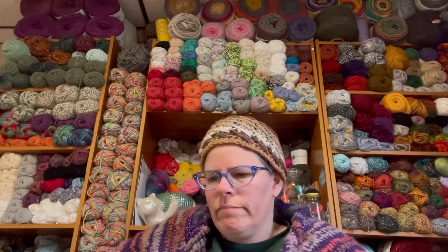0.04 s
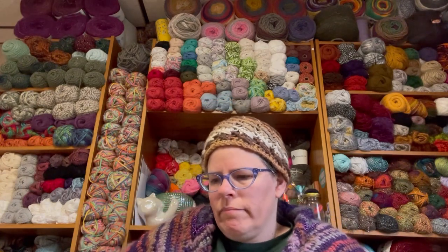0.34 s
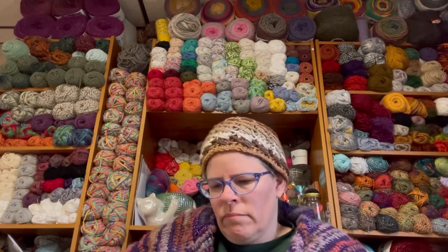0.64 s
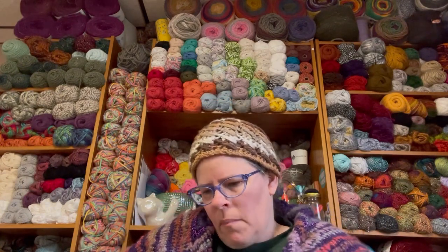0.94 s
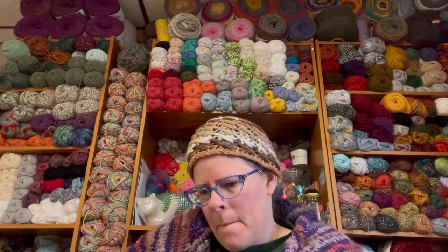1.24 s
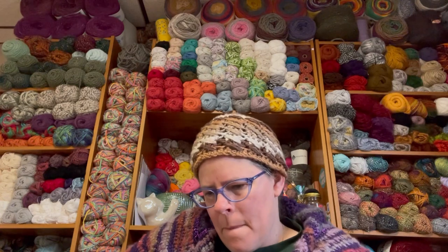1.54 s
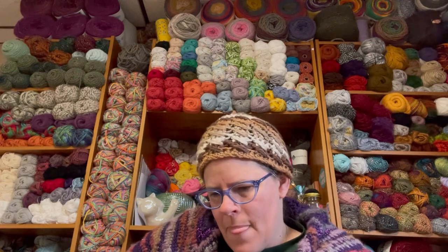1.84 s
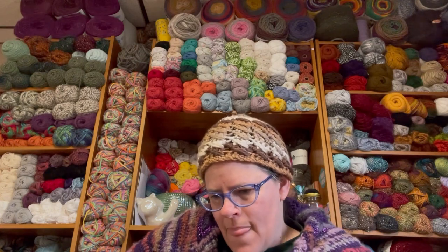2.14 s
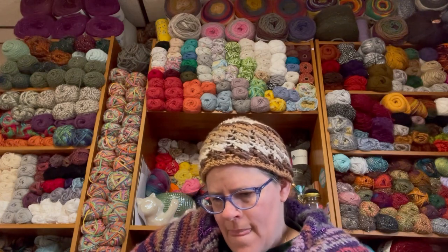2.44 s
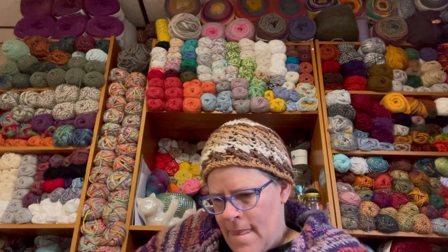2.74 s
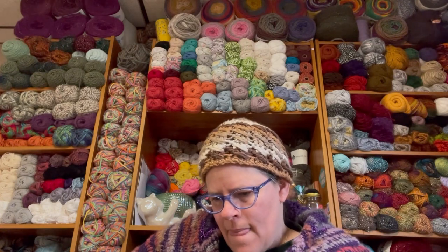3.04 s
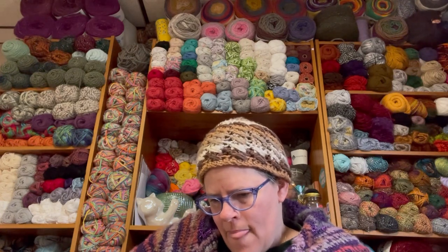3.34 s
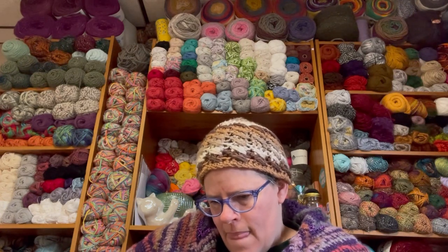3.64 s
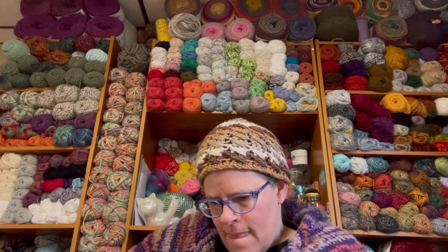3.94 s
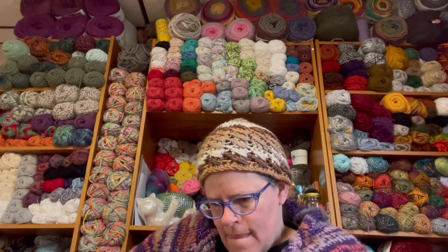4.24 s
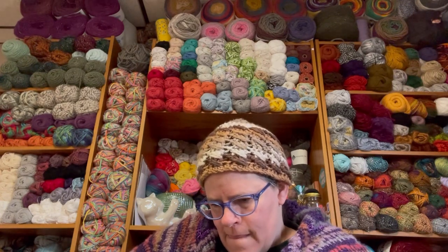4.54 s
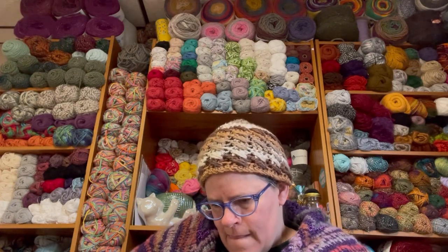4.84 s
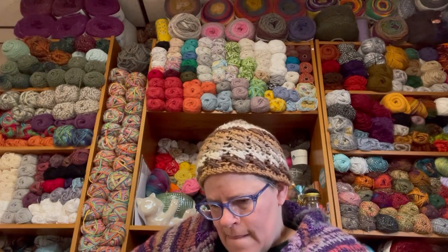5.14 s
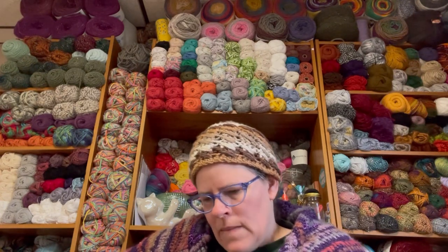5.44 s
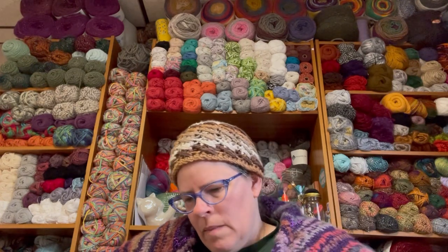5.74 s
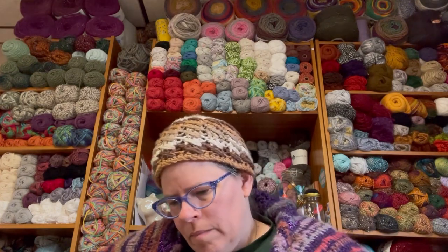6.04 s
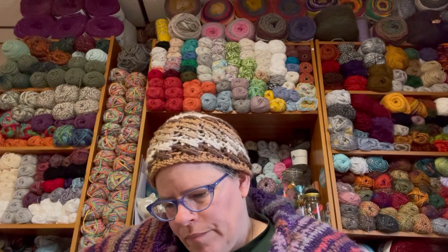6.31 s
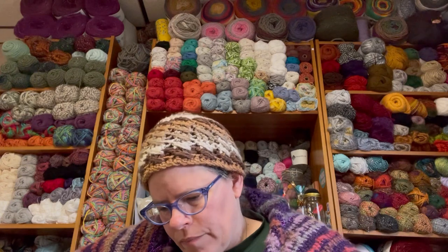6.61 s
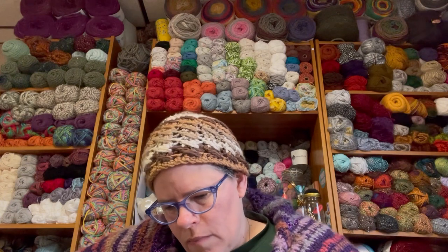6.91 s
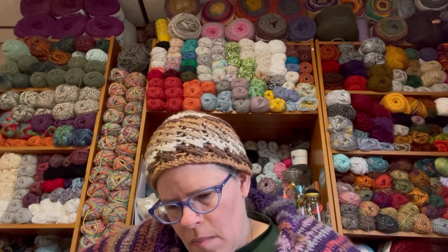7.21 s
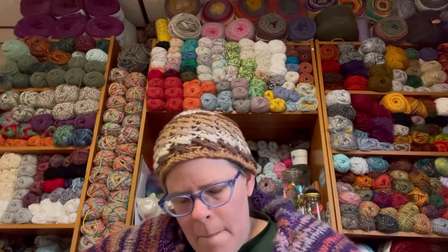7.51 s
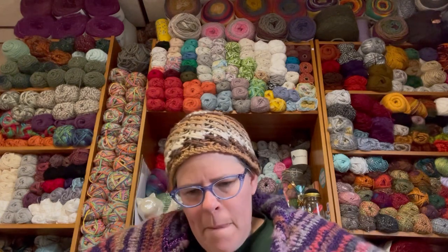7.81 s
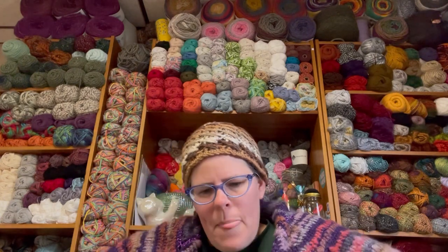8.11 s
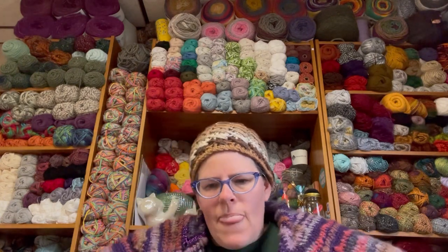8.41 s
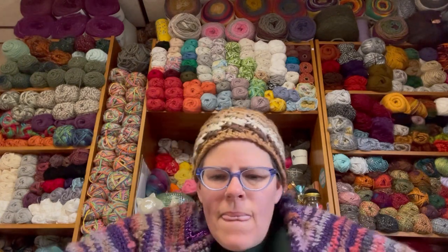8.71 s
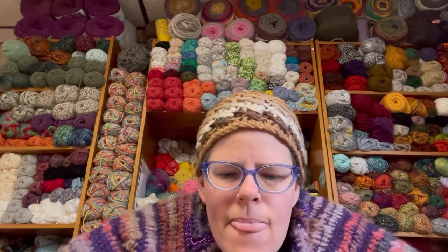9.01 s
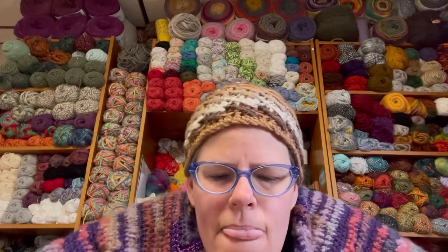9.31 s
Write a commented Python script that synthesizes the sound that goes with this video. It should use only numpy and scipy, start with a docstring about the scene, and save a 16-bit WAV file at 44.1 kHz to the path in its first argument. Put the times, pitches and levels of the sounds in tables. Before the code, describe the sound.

Fingers pick at packing tape on a cardboard box, starting with a tiny squeak and a few ticks. The tape comes away in short crackling jerks that drum on the cardboard. Hands brush the box, flaps knock and there is a sharp snap. Cardboard then slides with a hiss, a brief whistle and a judder, ending in a heavy knock. It is heard up close on a phone in a small, damped room with a low rumble.

```python
"""Over a low rumble, in a small room damped by shelves of yarn, fingers pick at packing tape on a box.
From 1.5 to 5 s the tape comes off in short jerks: its glue lets go in tiny slips that crackle in the
film and drum on the cardboard. Hands brush the box, flaps knock, and a sharp snap lands at 6.1 s.
From 7.2 s cardboard slides, an edge whistles and a flap judders; the heaviest knock comes at 8.8 s.
It is all heard up close, through a phone's stereo microphones."""
import sys
import numpy as np
from scipy import signal
from scipy.fft import rfft, irfft, next_fast_len
from scipy.io import wavfile
from scipy.ndimage import uniform_filter1d, map_coordinates

SR = 44100
rng = np.random.default_rng(int(sys.argv[2]) if len(sys.argv) > 2 else 0)


def persist_wave(psi):
    """Save psi, clipped to +-1, as 16-bit WAV."""
    counts = np.round(np.clip(psi, -1, 1) * 32767).astype(np.int16)
    wavfile.write(sys.argv[1], SR, np.atleast_2d(counts).T)


N = 412776

# Levels in the tables are relative; each layer sets its own trim.
# room tone, the low rumble and the faint hiss: freq_hz, level_db
RUMBLE_EQ = [(12, -41.5), (20, -16), (31, -6.5), (59, 2.5), (92, -12.5), (124, -2.5), (147, -19),
             (228, -15.5), (332, -20), (474, -30), (527, -34), (947, -42), (1120, -46.5), (1440, -67.5),
             (3000, -46.5), (3900, -84.5), (6600, -120)]
AIR_EQ = [(1000, 11), (2500, -0.5), (4500, -2), (7500, -2.5), (10000, 0), (14000, -7), (16000, -19.5)]
# early reflections off the shelves: freq_hz, level_db
SHELF_EQ = [(100, -8), (500, -9), (1200, -7), (2500, -1.5), (5000, -2.5), (9000, -12.5)]
# decay of the room's tail: freq_hz, t60_s
ROOM_DECAY = [(100, 0.47), (500, 0.14), (2000, 0.31), (8000, 0.36), (15000, 0.078)]
# modes of the panels, of the whole box with its air, and of a flap: freq_hz, level_db, t60_s
PANEL_MODES = [(220, -2.5, 0.035), (263.6, -0.5, 0.051), (311.7, -10.5, 0.087), (391, -2.5, 0.048),
               (477, -6.5, 0.058), (534.5, -2, 0.049), (645, -0.5, 0.039), (745, -2, 0.016),
               (884, -0.5, 0.03), (997, -0.5, 0.017), (1250, -12, 0.022), (1435, -13.5, 0.01),
               (1732, -7, 0.023), (1900, -11.5, 0.023), (2463, -9, 0.01), (4150, -14, 0.015)]
BOX_MODES = [(65.6, -13, 0.098), (90.5, 5.5, 0.039), (130, -6, 0.045), (167.6, -1, 0.051)]
FLAP_MODES = [(291, -9, 0.045), (484, -8.5, 0.019), (720, -2, 0.032), (900, -0.5, 0.02), (1060, -0.5, .016),
              (1219, -0.5, 0.01), (1964, -5.5, 0.014), (2520, -7.5, 0.012)]
# colours of a rubbing fingertip, scraping board and hissing paper fibres: freq_hz, level_db
FINGERTIP_EQ = [(700, 1), (1600, -13), (2150, 4), (2800, -13), (4500, -19), (5500, -7), (6800, -28),
                (12000, -35)]
SCRAPE_EQ = [(60, -28.5), (150, 5), (330, 0), (750, 2), (1200, -5), (1600, -10.5), (2200, -9),
             (3200, -18.5), (6000, -40), (15000, -49.5)]
FIBRE_EQ = [(800, -5.5), (2900, -7.5), (4000, -4), (5200, -5), (7000, -1.5), (9000, 0), (11000, -2),
            (13000, -3.5), (15000, -14.5), (16500, -23)]
# colours of ticking film, a knock's crack and the peel's crackle: freq_hz, level_db
FILM_EQ = [(500, -3.5), (1300, 0), (2200, -2), (4000, -4), (7000, -3), (11000, 5), (15500, -5.5)]
CRACK_EQ = [(200, -21.5), (900, 4), (2000, 6), (3000, -5), (5000, -3), (7000, 2.5), (10000, 4.5),
            (15000, -0.5)]
CRACKLE_EQ = [(300, -69.5), (1000, 11), (2400, 3.5), (3400, -2), (5000, -2.5), (7500, 0.5), (10000, 2),
              (15000, -10.5)]
# a fingertip rubs the tape: start_s, hold_s, level_db
FINGER_RUBS = [(.61, 0.022, -72), (.72, 0.073, -81), (2.797, 0.017, -77), (2.883, .15, -82),
               (3.126, .1, -77), (3.25, .1, -77)]
# a tiny opening squeak, and an edge whistling in the long slide: time_s, pitch_hz, level_db
SQUEAK_CURVE = [(.065, 2900, -82), (.073, 2840, -68), (.079, 2400, -84), (.083, 2170, -57),
                (.089, 2325, -80), (0.096, 2210, -58), (0.109, 1650, -84), (.122, 1610, -64),
                (.15, 1660, -87)]
WHISTLE_CURVE = [(7.7, 2495, -74), (7.8, 3090, -51), (7.88, 3810, -74)]
# a flap's edge drags over the box: time_s, level_db
DRAG_CURVE = [(8.062, -63), (8.069, -43.5), (8.082, -38), (8.093, -38.5), (8.105, -37), (8.128, -36.5),
              (8.165, -42.5), (8.23, -54)]
# short strokes of hands and cardboard: start_s, hold_s, scrape_db, hiss_db
SHORT_STROKES = [(1.173, 0.045, -52.5, -60.5), (1.255, 0.035, -60, -65.5), (1.673, 0.12, -69, -70),
                 (1.845, 0.19, -64.5, -67), (2.125, 0.023, -66, -66), (2.287, 0.042, -67.5, -70),
                 (2.598, 0.058, -62, -70.5), (3.475, 0.026, -64.5, -67), (5.229, 0.045, -45, -53.5),
                 (5.304, 0.096, -55.5, -64), (5.422, 0.067, -52.5, -52), (5.49, 0.093, -57.5, -56.5),
                 (5.613, 0.33, -63, -68), (5.813, 0.027, -50, -44), (5.874, 0.043, -61, -66),
                 (5.96, 0.16, -62, -58.5), (6.13, 0.024, -51.5, -75), (6.266, 0.15, -59, -54.5),
                 (6.468, 0.042, -47, -46), (6.557, 0.043, -48.5, -48), (6.636, 0.081, -54, -66.5),
                 (7.094, 0.0056, -61.5, -99.5), (8.804, 0.1, -56.5, -61.5), (8.939, 0.062, -52, -58),
                 (9.172, 0.16, -72, -73.5)]
# one long slide across the box: time_s, scrape_db, hiss_db
SLIDE_CURVE = [(7.24, -61.5, -64), (7.438, -49, -55), (7.628, -49.5, -56), (7.696, -54.5, -43),
               (7.836, -60, -42), (7.904, -53, -55), (7.988, -51.5, -47.5), (8.052, -49, -59.5),
               (8.094, -47, -45), (8.242, -49, -53.5), (8.322, -48, -48.5), (8.378, -50.5, -59),
               (8.534, -50, -48.5), (8.552, -48, -56.5), (8.576, -54.5, -50), (8.76, -78.5, -71)]
# ticks of film and fingernails: peak_s, level_db, centre_hz, t60_s, narrowness
FILM_TICKS = [(0.1028, -35.5, 9000, 0.072, 0.3), (1.1486, -42.5, 2780, 0.031, 0.5),
              (1.1915, -31, 8260, 0.016, 0.63), (1.9438, -27, 7360, 0.0077, 0.34),
              (2.2787, -38, 8950, 0.011, 0.63), (2.4358, -36, 4200, .01, 0.72),
              (2.4888, -35, 2230, .01, .5), (2.5126, -32, 4000, .01, 0.39), (2.5518, -40, 1900, .008, 0.67),
              (2.5638, -27.5, 1400, 0.0033, 0.46), (3.204, -59, 3220, 0.041, 1.1),
              (3.242, -50, 1800, 0.033, 0.42), (3.705, -31, 2480, 0.0057, .5),
              (4.0797, -46, 7950, .012, 0.57), (4.153, -36, 9170, 0.011, 0.45),
              (4.2495, -30, 4000, 0.0068, 0.39), (4.9421, -29, 8370, 0.0088, 0.61),
              (5.2748, -14.5, 1392, 0.014, 0.49), (5.6096, -35.5, 4200, 0.0094, 0.6),
              (5.7, -32.5, 4400, 0.019, 0.71), (6.098, -8, 10500, 0.021, 0.32),
              (6.1101, -6, 8000, 0.0085, .6), (6.718, -44, 3500, 0.012, .4),
              (7.225, -41.5, 2680, 0.059, 0.38), (8.768, -37.5, 8700, 0.011, 0.45),
              (9.25, -38, 3840, 0.015, 0.29)]
# blows on the box: start_s, thump_db, panel_db, crack_db, centre_hz, narrowness
BOX_KNOCKS = [(1.1975, -55, -33.5, -61, 860, 2.6), (1.1988, -51, -26.5, -78, 432, 1.8),
              (1.439, -42.5, -46.5, -90, 307, 0.54), (1.641, -38, -32, -50, 470, 1),
              (2.173, -46, -38.5, -54.5, 640, 1.4), (2.185, -46, -34, -46, 540, 2.2),
              (2.411, -57, -36.5, -65, 440, 0.68), (2.561, -38, -44, -69, 400, .9),
              (2.587, -35.5, -34, -56, 436, 1), (2.677, -45.5, -44.5, -81, 288, 1.1),
              (3.686, -41.5, -48, -64, 200, .9), (3.703, -38.5, -40, -69, 253, 0.85),
              (4.22, -43.5, -35.5, -53, 355.3, 0.77), (4.597, -41, -37, -67, 298, 0.89),
              (5.0214, -46.5, -28.5, -62, 574, 1.4), (5.0384, -55, -30.5, -48, 900, 1.4),
              (5.0425, -35.5, -30, -39, 650, 0.72), (5.0467, -38, -25, -48, 610, 0.83),
              (5.051, -27.5, -23, -61.5, 269, 1.1), (5.274, -42, -32.5, -51, 1390, 1.3),
              (5.277, -58, -41, -70, 260, 1.2), (6.096, -42, -32, -34.5, 500, 0.92),
              (6.101, -38.5, -48, -45, 1700, 0.75), (6.1106, -33, -21.5, -30, 317, 0.99),
              (6.1106, -51, -28, -51, 1680, 2.5), (6.471, -34.5, -37.5, -49, 1000, 0.41),
              (6.4985, -56, -27.5, -48, 990, 1.2), (6.4997, -70, -38, -54, 2140, 1.7),
              (6.501, -51.5, -25.5, -56.5, 305, 1.07), (6.5115, -52.5, -45, -51.5, 500, .8),
              (7.102, -71, -56.5, -83, 845, 1), (7.429, -41.5, -55, -55, 487, 0.47),
              (7.449, -42, -48, -72, 250, 0.71), (8.066, -58, -46, -55, 720, 1.1),
              (8.089, -67, -37, -59, 1170, 1.2), (8.309, -48, -42, -79, 504, 0.58),
              (8.336, -40, -46, -66, 750, 1.4), (8.348, -28.5, -48, -75, 300, 1),
              (8.38, -54, -44, -63, 620, 0.37), (8.549, -67, -42.5, -55, 900, 1),
              (8.831, -46.5, -33, -59.5, 780, 0.97), (8.841, -39, -18, -35.5, 285, 0.62),
              (8.8465, -14, -16, -34.5, 695, 0.63)]
# jerks on the tape: start_s, hold_s, panel_db, crackle_db, creak_db, pitch_hz
TAPE_JERKS = [(1.462, 0.1, -55, -92, -59, 480), (1.634, .004, -53.5, -51.5, -43.5, 560),
              (1.643, 0.0058, -46, -46.5, -44, 560), (1.966, 0.0062, -55, -65, -43, 490),
              (2.009, 0.0087, -63, -86, -54, 500), (2.175, 0.021, -38.5, -47.5, -38, 600),
              (2.207, 0.026, -39, -47, -37, 505), (2.396, .015, -43, -48.5, -52, 520),
              (2.415, 0.032, -37.5, -45.5, -40, 500), (2.452, 0.024, -41.5, -51, -49, 560),
              (2.491, 0.028, -35, -46, -49, 450), (2.524, 0.044, -33.5, -51.5, -36, 540),
              (2.68, 0.0059, -58, -72, -49, 300), (3.69, 0.027, -36.5, -47, -47, 500),
              (4.14, 0.015, -56, -64.5, -55, 580), (4.218, 0.011, -39.5, -50, -46, 400),
              (4.24, 0.013, -33.5, -47, -38, 480), (4.474, 0.022, -45, -60.5, -54, 318),
              (4.548, 0.03, -45, -54.5, -58, 370), (4.604, 0.016, -46, -61, -45, 280),
              (4.868, 0.025, -52, -58.5, -57, 552), (4.933, 0.033, -35.5, -53, -48, 420),
              (4.997, 0.0078, -43, -51, -56, 550), (5.042, 0.022, -25, -35, -36, 600),
              (6.094, .006, -47, -43.5, -72, 1400)]
# balance of the microphone pair: freq_hz, left_minus_right_db
MIC_BALANCE = [(60, 2.5), (130, 3.5), (250, 4), (600, 2), (1200, 1.5), (2200, 4), (3800, 0), (5400, -7),
               (7000, -1.5), (15000, -1.5)]
# phase between the microphones: freq_hz, left_lead_rad
MIC_PHASE = [(300, 0), (900, -.3), (2500, 0), (7000, 0), (8700, 1), (11000, np.pi), (12700, 4),
             (13800, 2 * np.pi)]

PUSH_DB_PER_S, STOP_DB_PER_S = 618.5, 390  # attack and release of a stroke
GRIP_DB_PER_S, LET_GO_DB_PER_S = 994, 751  # attack and release of a jerk
TIRE_DB_PER_S, SAG_OCTAVES_PER_S = 41, 3  # as the peel runs on it weakens and the ring drops
STRAIN_DB, STRAIN_DB_PER_S = -21, 260  # the taut tape sounds faintly around each jerk


def amp(db):
    """Decibels to gain."""
    return 10 ** (np.asarray(db) / 20)


def unit(x):
    """x at rms 1."""
    return x / np.sqrt(np.mean(x ** 2) + 1e-20)


def unit_hit(x):
    """A hit with the energy of 20 ms at rms 1."""
    return x * np.sqrt(SR / 50 / np.sum(x ** 2))


def along(points, hz):
    """A curve of (freq_hz, value) points, read on a log frequency axis."""
    freqs, values = np.transpose(points)
    return np.interp(np.log(hz + 1), np.log(freqs + 1), values)


def wobble(knots_per_s):
    """A smooth random modulator."""
    knots = rng.standard_normal(int(N * knots_per_s / SR) + 4)
    return map_coordinates(knots, [np.arange(N) * knots_per_s / SR])


def filtered(x, response):
    """x through a frequency response."""
    n = x.shape[-1]
    padded = next_fast_len(n + 8192)
    return irfft(rfft(x, padded) * response(np.fft.rfftfreq(padded, 1 / SR)), padded)[..., :n]


def low_cut(x, corner_hz):
    """x through a two-pole high-pass."""
    return filtered(x, lambda hz: (1j * hz / (corner_hz + 1j * hz)) ** 2)


def coloured(x, eq):
    """x through an EQ curve, at rms 1."""
    return unit(filtered(x, lambda hz: amp(along(eq, hz))))


def patchy(x, depth_db):
    """x with a colour that drifts in patches of frequency and time."""
    spectra = signal.stft(x, nperseg=512)[2]
    patches = uniform_filter1d(rng.standard_normal(spectra.shape[-2:]), 9, axis=0)
    patches = uniform_filter1d(patches, 10, axis=1)
    return signal.istft(spectra * amp(depth_db * unit(patches)), nperseg=512)[1][..., :N]


def add(track, start_s, sound):
    """Mix a sound into the track."""
    part = track[max(round(start_s * SR), 0):][:len(sound)]
    part += sound[:len(part)]


def gesture(start_s, hold_s, rise, fall, droop=0):
    """Envelope of one movement: rise, drooping hold and fall, with slopes in dB a second."""
    out = np.zeros(N)
    t = np.arange(max(-start_s, -.25), hold_s + .35, 1 / SR)
    level_db = rise * np.minimum(t, 0) - droop * np.maximum(t, 0) - fall * np.maximum(t - hold_s, 0)
    add(out, start_s + t[0], amp(level_db))
    return out


def bell(hz, centre_hz):
    """A bell curve around the pitch that the point of contact favours."""
    return 1 / (1 + (np.log2(hz / centre_hz) / 0.45) ** 2)


def ring(modes, t, scatter_db, weight=1):
    """Damped modes, their strengths scattered at random by scatter_db."""
    hz, db, t60 = np.transpose(modes)
    size = weight * amp(db + scatter_db * rng.standard_normal(len(hz)))
    return size @ (amp(-60 * t / t60[:, None]) * np.sin(2 * np.pi * hz[:, None] * t))


def slips(per_s, spread_db):
    """Tiny impulses, uneven in timing and size."""
    happens = rng.random(N) < per_s / SR
    size = amp(spread_db * np.clip(rng.standard_normal(N), -2, 2))
    return unit(happens * size * rng.choice([-1, 1], N))


def stick_slip(per_s, unevenness, spread_db):
    """Tension builds and lets go again and again, at a wandering rate and in clumps."""
    count = np.floor(np.cumsum(per_s * np.exp(unevenness * wobble(260))) / SR)
    size = amp(spread_db * np.clip(rng.standard_normal(N), -2, 2) + 2.2 * wobble(90))
    return unit(np.diff(count, prepend=0) * size * rng.choice([-1, 1], N))


def room_tone():
    """The bed: a low, nearly mono rumble leaning left, under a faint wide hiss."""
    width = amp(-9) * rng.standard_normal((2, N))
    rumble = coloured(rng.standard_normal(N) + width, RUMBLE_EQ) * amp(0.36 * wobble(34))
    air = coloured(rng.standard_normal((2, N)), AIR_EQ)
    return amp(-55.5) * amp([[1.5], [-1.5]]) * rumble + amp(-72) * air


def room_impulse():
    """Close shelves answer at once; the yarn leaves only a faint, short tail."""
    hz, t, spectra = signal.stft(rng.standard_normal((2, SR // 4)), SR, nperseg=256)
    decay = amp(-60 * t / along(ROOM_DECAY, hz)[:, None])
    tail = signal.istft(spectra * decay, SR, nperseg=256)[1]
    early = rng.standard_normal(tail.shape) * amp(-60 * np.arange(tail.shape[1]) / SR / 0.075)
    early = filtered(early / np.linalg.norm(early[0]), lambda f: amp(along(SHELF_EQ, f)))
    return early + amp(-17.5) * tail / np.linalg.norm(tail[0])


def reflections(x):
    """The box and the arms keep moving, so each overlapping grain gets fresh reflections."""
    out, hop = np.zeros((2, N + SR)), SR // 5
    x = np.pad(x, (hop, 2 * hop))
    for start in range(0, N + hop, hop):
        grain = x[start:start + 2 * hop] * np.sqrt(np.hanning(2 * hop))
        wet = signal.fftconvolve(grain[None], room_impulse(), axes=1)
        out[:, start:start + wet.shape[1]] += wet
    return out[:, hop:hop + N]


def fingertip():
    """A fingertip feels along the tape with a faint, thin rubbing."""
    level = sum(amp(db) * gesture(start_s, hold_s, PUSH_DB_PER_S, STOP_DB_PER_S)
                for start_s, hold_s, db in FINGER_RUBS)
    return level * amp(2 * wobble(40)) * coloured(rng.standard_normal(N), FINGERTIP_EQ)


def squeak(curve, roughness):
    """A scratchy friction tone that glides, stutters and wavers in pitch."""
    t = np.arange(N) / SR
    time_s, hz, db = np.transpose(curve)
    pitch_hz = np.interp(t, time_s, hz) * (1 + roughness * wobble(2000))
    tone = unit(amp(3.6 * wobble(200)) * np.sin(2 * np.pi * np.cumsum(pitch_hz) / SR))
    gate = (t > time_s[0]) & (t < time_s[-1])
    return amp(np.interp(t, time_s, db)) * gate * tone


def flap_drag():
    """A cut edge judders along the board and rings its flap."""
    level_db = np.interp(np.arange(N) / SR, *np.transpose(DRAG_CURVE), left=-150, right=-150)
    flap = ring(FLAP_MODES, np.arange(SR // 8) / SR, scatter_db=0)
    judder = slips(per_s=1300, spread_db=4)
    return amp(level_db - 0.5) * unit(signal.oaconvolve(judder, flap)[:N])


def slide_envelopes():
    """Scrape gain and hiss gain of the long slide and the short strokes."""
    time_s, slide_scrape_db, slide_hiss_db = np.transpose(SLIDE_CURVE)
    t = np.arange(N) / SR
    fades = gesture(time_s[0], time_s[-1] - time_s[0], PUSH_DB_PER_S, STOP_DB_PER_S)
    gains = fades * amp([np.interp(t, time_s, slide_scrape_db), np.interp(t, time_s, slide_hiss_db) - 1])
    for start_s, hold_s, scrape_db, hiss_db in SHORT_STROKES:
        stroke = gesture(start_s, hold_s, PUSH_DB_PER_S, STOP_DB_PER_S)
        gains = np.maximum(gains, amp([[scrape_db], [hiss_db]]) * stroke)
    return gains


def sliding():
    """Paper fibres catch as surfaces slide: fine hiss and small snags over the board's hollow scrape."""
    scrape_gain, hiss_gain = slide_envelopes()
    catches = slips(per_s=980, spread_db=2.5)
    wide = rng.standard_normal((2, 2, N))  # a broad surface reaches each microphone differently
    board = coloured(catches + amp(6) * wide[0], SCRAPE_EQ) * amp(0.74 * wobble(45))
    fibres = coloured(amp(-13) * catches + wide[1], FIBRE_EQ) * amp(0.6 * wobble(35))
    snags = stick_slip(per_s=70, unevenness=.9, spread_db=4.5)
    flap = ring(FLAP_MODES, np.arange(SR // 8) / SR, scatter_db=5)
    snagging = unit(signal.oaconvolve(snags, flap)[:N]) + amp(-5) * coloured(snags, CRACKLE_EQ)
    scrape = amp(-1) * board + amp(-9.5) * snagging
    return patchy(scrape_gain * scrape + amp(2.5) * hiss_gain * fibres, depth_db=2.5)


def ticks():
    """The stiff film creaks faintly as it tightens, then snaps."""
    out, t = np.zeros(N), np.arange(-SR // 16, SR // 16) / SR
    for peak_s, level_db, centre_hz, t60_s, narrowness in FILM_TICKS:
        tighten = amp(-29.5 - 60 * abs(t) / 0.096)
        attack = amp(-60 * abs(t) / (0.26 * t60_s))
        envelope = np.where(t < 0, np.maximum(tighten, attack), amp(-60 * abs(t) / t60_s))
        film = coloured(rng.standard_normal(len(t)), FILM_EQ)
        film = filtered(film, lambda hz: bell(hz + 1, centre_hz) ** narrowness)
        add(out, peak_s + t[0], amp(level_db - 10.5) * unit(film) * envelope)
    return out


def panel_dispersion(hz):
    """A panel carries treble faster than bass, so each blow leaves it as a quick downward chirp."""
    lag_cycles = .0032 * (2 * np.sqrt(1000 * (hz + 40)) - 400 - .35 * hz)
    return np.exp(-2j * np.pi * lag_cycles)


def knocks():
    """A blow crunches at the contact, rings the panels around one pitch and heaves the whole box."""
    out, t = np.zeros(N), np.arange(SR // 4) / SR
    mode_hz = np.transpose(PANEL_MODES)[0]
    for start_s, thump_db, panel_db, crack_db, centre_hz, narrowness in BOX_KNOCKS:
        polarity = rng.choice([-1, 1], len(mode_hz))  # each mode pushes towards the microphone or away
        weight = polarity * bell(mode_hz, centre_hz) ** narrowness
        damping = amp(-.3 * centre_hz * t)  # higher, stiffer spots die away sooner
        panel = damping * ring(PANEL_MODES, t, scatter_db=1.54, weight=weight)
        panel = unit_hit(low_cut(panel, corner_hz=0.16 * centre_hz))
        thump = unit_hit(ring(BOX_MODES, t, scatter_db=0) * (1 - np.exp(-t / 0.0035)))
        burst = amp(-60 * t / 0.013) * (1 - np.exp(-t / 0.00056))
        crack = unit_hit(coloured(rng.standard_normal(len(t)), CRACK_EQ) * burst)
        hit = amp(thump_db + 2.5) * thump + amp(panel_db - 3.45) * panel + amp(crack_db + 1) * crack
        add(out, start_s, hit)
    return low_cut(filtered(out, panel_dispersion), corner_hz=36)  # a small box radiates little deep bass


def jerk_envelopes():
    """Gains of panel, crackle and creak, and the ring's pitch: the strongest jerk of the moment leads."""
    t = np.arange(N) / SR
    panel, crackle, creak = np.zeros((3, N))
    centre_hz = np.full(N, TAPE_JERKS[0][-1], float)
    for start_s, hold_s, panel_db, crackle_db, creak_db, pitch_hz in TAPE_JERKS:
        peel = gesture(start_s, hold_s, GRIP_DB_PER_S, LET_GO_DB_PER_S, TIRE_DB_PER_S)
        strain = amp(STRAIN_DB) * gesture(start_s, hold_s, STRAIN_DB_PER_S, STRAIN_DB_PER_S)
        effort = np.maximum(peel, strain)
        leads = amp(panel_db) * effort > panel
        centre_hz[leads] = pitch_hz * 2 ** (-SAG_OCTAVES_PER_S * (t[leads] - start_s))
        panel = np.maximum(panel, amp(panel_db) * effort)
        crackle = np.maximum(crackle, amp(crackle_db) * effort)
        creak = np.maximum(creak, amp(creak_db) * peel ** 2)  # only a firm pull makes the board creak
    return panel, crackle, creak, centre_hz


def tape_peel():
    """The glue lets go in slips that crackle in the film and drum on the panels; the board creaks."""
    panel_gain, crackle_gain, creak_gain, centre_hz = jerk_envelopes()
    t = np.arange(SR // 14) / SR
    glue = stick_slip(per_s=620, unevenness=.45, spread_db=3.5)
    drum, power = np.zeros((2, N))
    for hz, db, t60_s in PANEL_MODES + BOX_MODES[-1:]:
        mode = amp(db - 60 * t / t60_s) * np.sin(2 * np.pi * hz * t) * rng.choice([-1, 1])
        weight = bell(hz, 0.87 * centre_hz) ** 0.44  # the ring shifts as the peel line travels
        drum += weight * signal.oaconvolve(glue, mode)[:N]
        power += weight ** 2 * np.sum(mode ** 2)
    drum /= np.sqrt(power)  # level stays even while the colour moves
    crackle = coloured(glue + amp(-3.5) * rng.standard_normal(N), CRACKLE_EQ)
    creak_hz = centre_hz * (1 + .07 * wobble(260))
    creak = unit(amp(3.4 * wobble(170)) * np.sin(2 * np.pi * np.cumsum(creak_hz) / SR))
    return (amp(-1.5) * panel_gain * drum + amp(-2) * crackle_gain * crackle
            + amp(-2.5) * creak_gain * creak)


def scene():
    """The box sits dead centre and feeds the room; the sliding spreads wider, over the room tone."""
    box = tape_peel() + knocks() + ticks() + flap_drag() + fingertip()
    box += squeak(SQUEAK_CURVE, roughness=0.107) + squeak(WHISTLE_CURVE, roughness=.16)
    return amp(-1) * box + reflections(box) + sliding() + room_tone()


def record(dry):
    """The phone shares one treble signal between channels, shifts balance and phase, and trims the ends."""
    treble_side = filtered(dry[0] - dry[1], lambda hz: np.clip((hz - 5000) / 2000, 0, 1))
    pair = np.array([dry[0], dry[1] + treble_side])
    side, left = np.array([[.5], [-.5]]), np.array([[1], [0]])
    pair = filtered(pair, lambda hz: amp(side * along(MIC_BALANCE, hz))
                    * np.exp(1j * left * along(MIC_PHASE, hz)))
    pair = filtered(pair, lambda hz: hz ** 2 / (hz ** 2 + 26 ** 2))  # sub-bass roll-off
    return filtered(pair, lambda hz: 1 / (1 + (hz / 15800) ** 120))  # brick-wall high cut


dry = scene()
out = record(dry)
persist_wave(out)
```